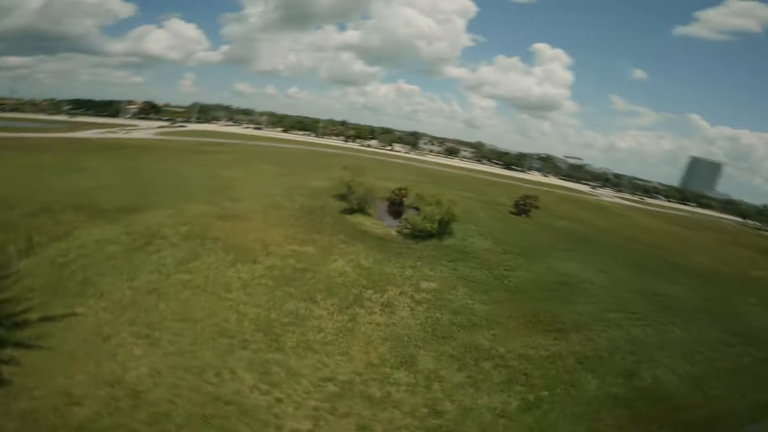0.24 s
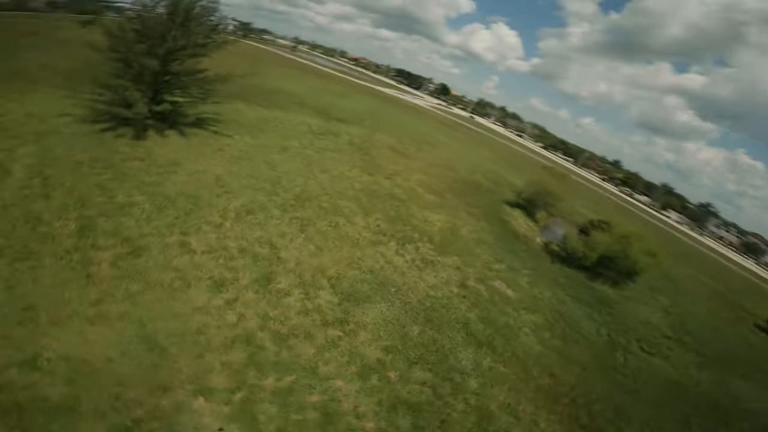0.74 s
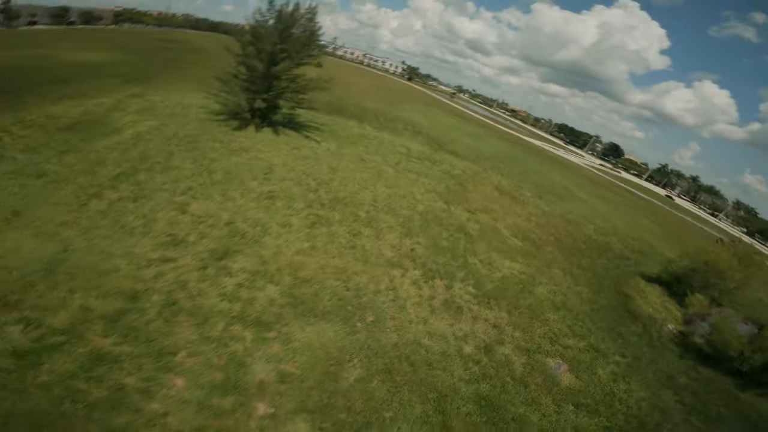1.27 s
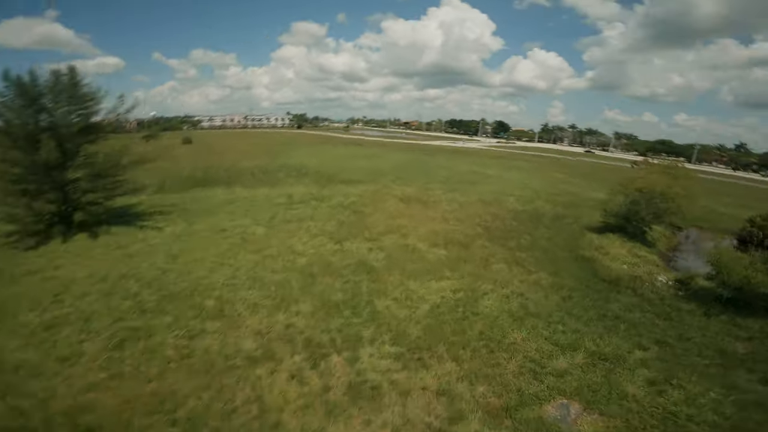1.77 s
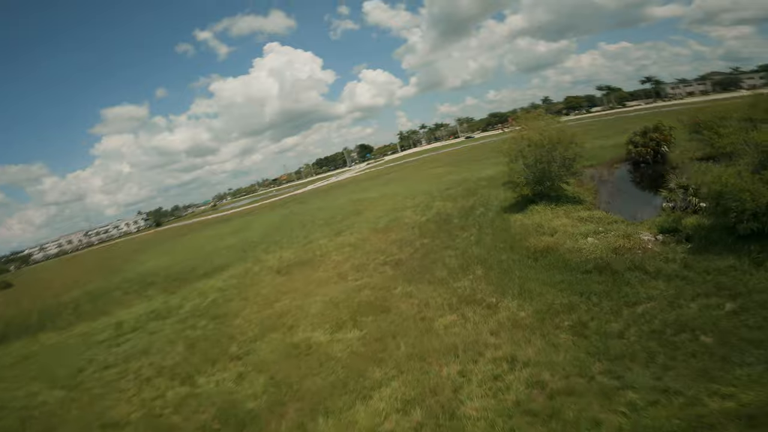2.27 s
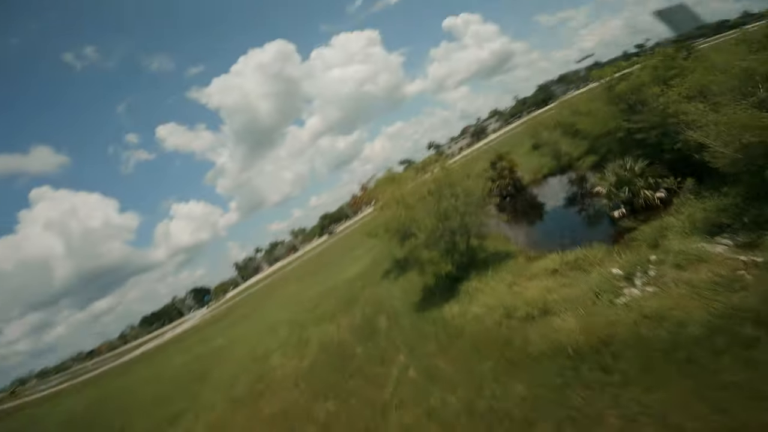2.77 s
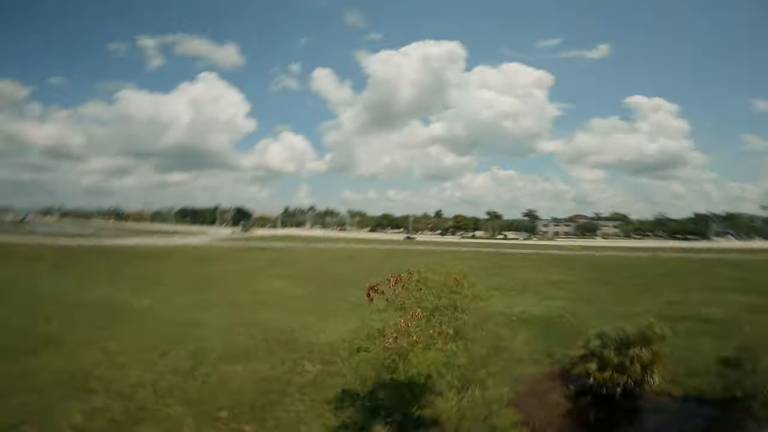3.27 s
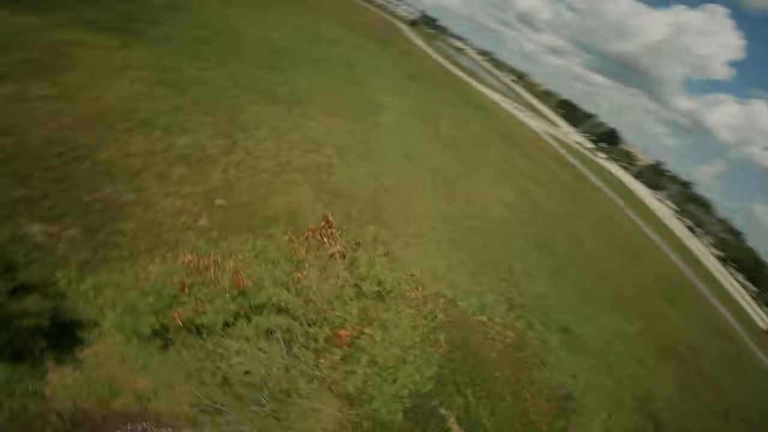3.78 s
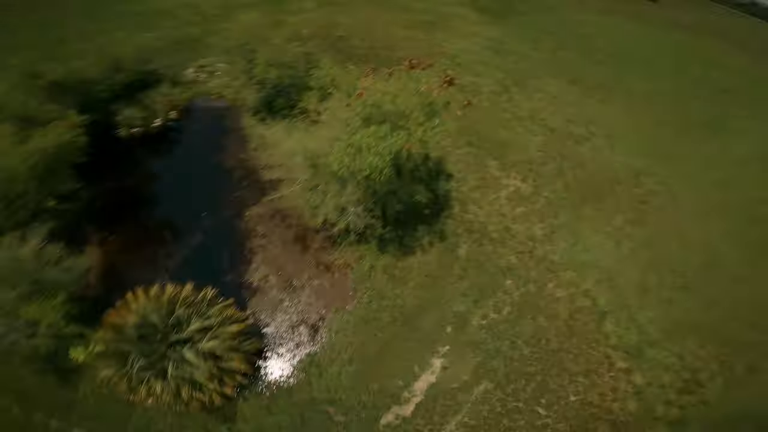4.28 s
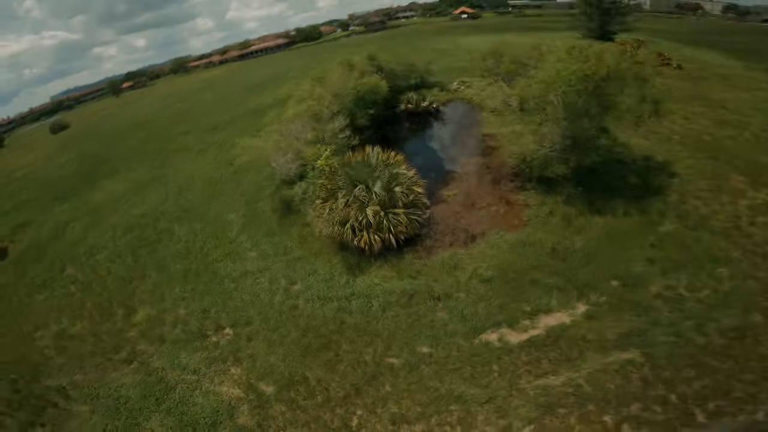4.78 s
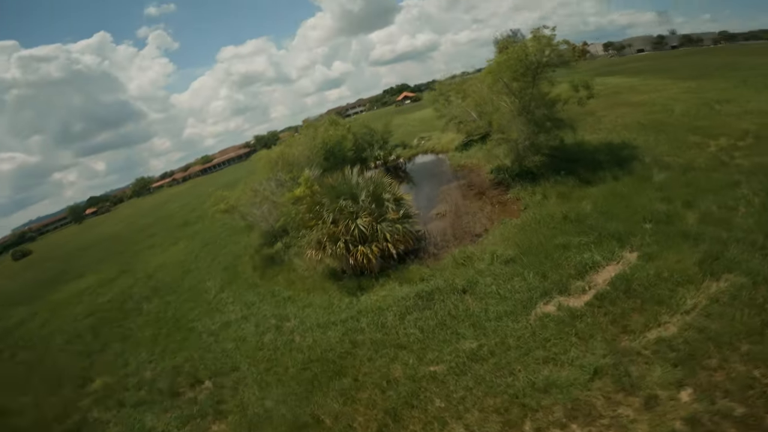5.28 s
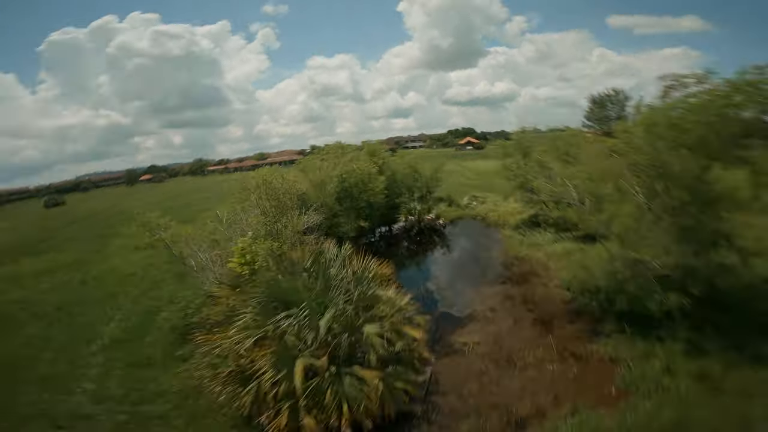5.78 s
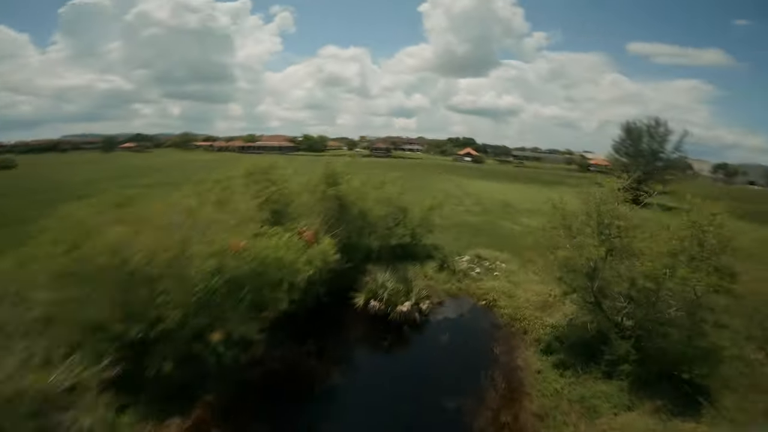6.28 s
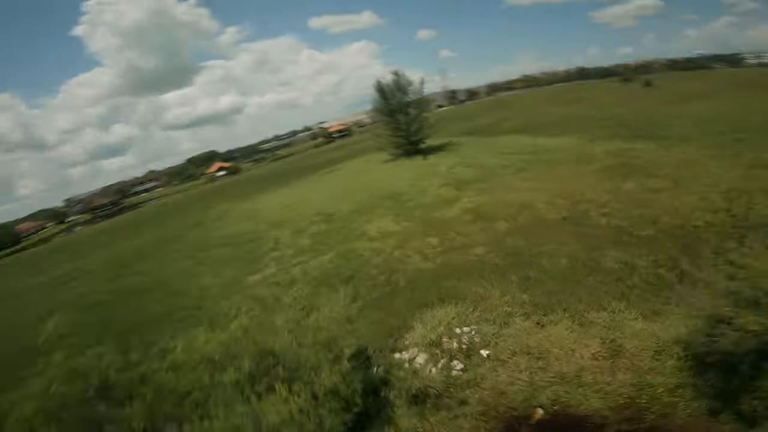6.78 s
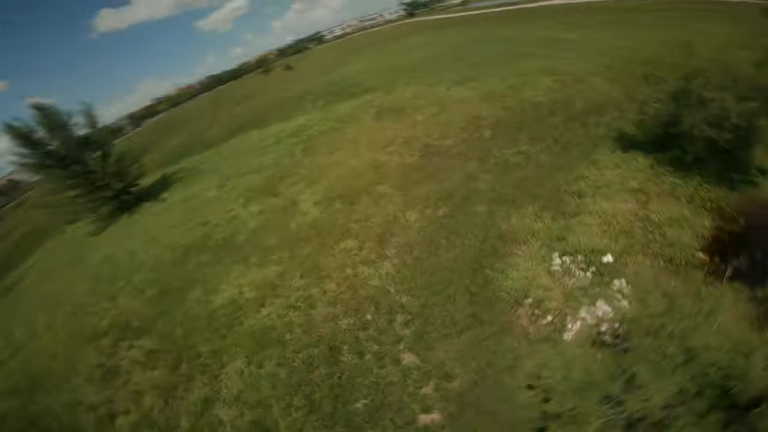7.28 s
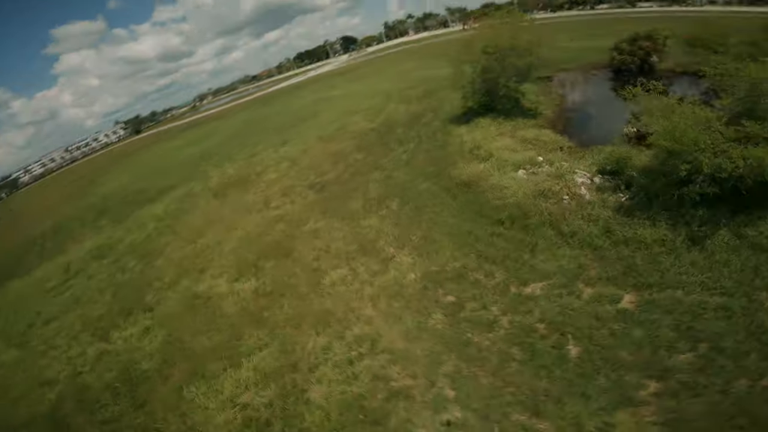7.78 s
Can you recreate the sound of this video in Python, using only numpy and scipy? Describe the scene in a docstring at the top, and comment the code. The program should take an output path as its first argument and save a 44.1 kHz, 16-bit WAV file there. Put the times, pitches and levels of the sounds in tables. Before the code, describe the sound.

Onboard quadcopter motors hum and beat, swelling to strained whines, sinking to a low flutter mid-flight, then surging again amid rumbling airflow.

```python
"""Four rotors of a small quadcopter sing over an open field, heard by a microphone on its own frame.
Each is a harmonic series on its blade rate; they beat as the controller parts their speeds.
Buffeting and a deeper rumble are flickering bands of noise, and a faint noise band whistles at the port.
The blade tips hiss: noise that swells with each sweep. A limiter and the port shape the mix."""
import sys
import numpy as np
from scipy import signal
from scipy.fft import rfft, irfft, next_fast_len
from scipy.io import wavfile
from scipy.ndimage import uniform_filter1d, minimum_filter1d

SR = 44100
rng = np.random.default_rng(int(sys.argv[2]) if len(sys.argv) > 2 else 0)


def int16_out(signal):
    """Quantize to a 16-bit WAV file."""
    q = np.round(np.clip(np.atleast_2d(signal).T, -1, 1) * 32767)
    wavfile.write(sys.argv[1], SR, q.astype(np.int16))


N = 354387

# Source levels are set ahead of the limiter and the port; spectra give shape only.
# throttle, as the blade rate asked of the nearest rotor: [t/s, f/Hz]
THROTTLE_CURVE = [(0, 198.7), (.1, 197.9), (.23, 179.6), (.5, 228), (.6, 280.9), (.7, 328.8), (.82, 410.9),
                  (.91, 428.7), (1.1, 315.5), (1.3, 288.5), (1.9, 254), (2.45, 256.7), (2.72, 285.4),
                  (2.92, 460.4), (3.08, 481.6), (3.25, 312), (3.4, 153.8), (3.55, 70.36), (3.72, 98),
                  (3.78, 69.9), (3.86, 100), (4.0, 64.16), (4.25, 62.58), (4.55, 94.86), (4.66, 177.2),
                  (4.77, 205.6), (4.88, 403.4), (5.03, 275.7), (5.09, 363.6), (5.3, 444), (5.41, 496),
                  (5.56, 319.5), (5.9, 292.7), (6.24, 353.8), (6.4, 307.7), (6.8, 226.2), (7.2, 176.3),
                  (7.4, 167.3), (7.52, 189.8), (7.75, 279.7), (7.92, 368), (8.04, 386.7)]
# voice of the nearest rotor; the last two are offsets to the overtone rules:
# [t/s, fundamental level/dB, second harmonic offset/dB, higher overtone offset/dB]
NEAR_VOICE = [(0, -15.5, 3, -2), (.3, -8.5, 2.5, -4), (.65, -14, 1.5, -1.5), (.9, -14, 7, -3),
              (1.1, -19, 2, -4), (1.3, -8, -0.5, 2), (1.7, -9, 0.5, -0.5), (2.3, -6.5, -2.5, -3),
              (2.55, -13, -11, -6), (2.8, -12.5, 3, -4), (2.95, -17, 10.5, -1.5), (3.08, -17, 13.5, 0.5),
              (3.16, -17, 6.5, -2), (3.3, -11.5, 2, -6), (3.48, -24, -7, -11), (3.8, -17, -10, -14),
              (4.1, -14.5, -10, -6), (4.5, -18.5, -5, 1), (4.6, -17, -4, -5), (4.7, -14.5, -6, -11),
              (4.9, -15.5, -8, -22), (5.02, -21, -1.5, -7), (5.1, -13, 0.5, -7), (5.3, -13, 7, 5),
              (5.4, -9.5, 13, 0), (5.55, -12, 1.5, 1.5), (6.2, -7.5, 4, 1.5), (6.5, -16, -0.5, -1.5),
              (7.15, -9, -2, 0.5), (7.4, -15.5, -1, 2.5), (7.55, -19, -9, -16), (7.75, -6.5, 2.5, -5.5),
              (8.04, -17, -7, -5.5)]
# rotor that steering makes lead the nearest: [t/s, lead f/Hz, fundamental level/dB, overtone offset/dB]
LEADING_ROTOR = [(0, 26.3, -14, -24), (.3, 30.6, -18, -18), (.5, 126, -27, -7), (.68, 147, -36.5, -7),
                 (.8, 108, -13.5, -1), (.92, 88, -25.5, -1), (1.1, 33, -14, -2.5), (1.25, 19.8, -39, -3.5),
                 (2.3, 8.3, -10.5, -14), (2.4, 31.4, -13.5, 1), (2.63, 64, -12.5, 1.5),
                 (2.8, 52.4, -18.5, -4), (2.92, 78.5, -31, 4), (3.1, 96, -27, 7), (3.3, 42, -28, -3),
                 (3.55, 71, -27, -26), (4.45, 69.3, -19, -11), (4.75, 92, -20.5, -23),
                 (4.95, 52, -50, -1.5), (5.4, 55, -20.5, -6), (5.6, 37.4, -16.5, -1), (6.2, 21, -19.5, -12),
                 (6.5, 31.2, -15.5, 2), (7.0, 19.4, -17.5, -6.5), (7.3, 58.5, -11, -4),
                 (7.78, 40, -21.5, -5.5), (7.9, 114, -15, 5), (8.04, 8.2, -16.5, -5)]
# rotor that mostly trails, negative lag when ahead: [t/s, lag f/Hz, fundamental level/dB]
TRAILING_ROTOR = [(0, 29, -7.5), (.42, 49.5, -16), (.5, -80.5, -24), (.54, -65.5, -16), (.63, -20.5, -13),
                  (.71, -30, -16), (.78, 18, -31), (.95, 30, -16.5), (1.1, 36, -17), (1.28, 63.5, -18),
                  (1.35, 40, -46), (2.0, 18, -13.5), (2.7, 25, -17.5), (3.1, 19.5, -30.5), (6.2, 40, -39.5),
                  (6.32, 70, -19), (6.45, 36.5, -19.5), (7.25, 11, -30.5), (7.38, 20, -8),
                  (7.5, -43.5, -14), (7.7, 78.5, -25), (7.9, 79, -22)]
# airstream buffeting, and tip hiss before its make-up gain: [t/s, buffeting level/dB, hiss level/dB]
AIR_LEVELS = [(0, -20.5, -42), (.3, -24, -41.5), (.68, -12, -35), (.78, -17.5, -29.5), (1.3, -19, -34.5),
              (1.7, -19.5, -39.5), (2.25, -24, -41), (2.8, -16.5, -39.5), (3.07, -13, -37.5),
              (3.17, -14.5, -39.5), (3.9, -11.5, -43), (4.45, -18, -48.5), (4.79, -17, -38.5),
              (4.85, -12.5, -27.5), (5, -14.5, -34.5), (5.2, -17.5, -31), (5.55, -23.5, -36),
              (6.2, -20, -32.5), (6.45, -21.5, -39), (6.75, -14, -40), (7.1, -30, -45), (7.35, -30.5, -44),
              (7.5, -13.5, -39.5), (7.92, -12, -30), (8.04, -21.5, -45)]
# spectrum of the buffeting: [f/Hz, level per Hz/dB]
BUFFET_SPECTRUM = [(50, -15.5), (90, -2), (150, -1.5), (300, -4), (600, -13.5), (1200, -23), (2500, -46.5)]
# loudness of the deepest buffeting: [t/s, level/dB]
RUMBLE_LEVELS = [(0.0, -32), (0.92, -17), (2.06, -26.5), (4.19, -19), (4.52, -17.5), (4.97, -11.5),
                 (5.77, -26.5), (6.91, -23), (7.18, -39), (7.54, -16.5), (7.9, -27), (8.04, -32)]
# spectrum of the deepest buffeting: [f/Hz, level per Hz/dB]
RUMBLE_SPECTRUM = [(18, -5.5), (35, -3.5), (60, 1.5), (90, -1.5), (140, -11)]
# spectrum of the tip hiss before its moving tilt: [f/Hz, level per Hz/dB]
HISS_SPECTRUM = [(400, 1.5), (1000, 5), (2000, 7.5), (3500, 5.5), (7000, -0.5), (15000, -11)]
# response of the microphone behind its port: [f/Hz, level/dB]
PORT_RESPONSE = [(3500, -4), (4700, -1), (5400, -3.5), (6500, -11), (7400, -10.5), (8300, -18),
                 (9600, -16.5), (10600, -19.5), (12000, -32.5), (14000, -25), (15500, -54)]

REFERENCE_HZ = 300   # blade rate at which the overtone rules are stated
SPEED_SMOOTHING_S = 0.046   # the motors round off every change
# overtones made by chopping the wash: level at the reference rate, rise with speed, ties to the air levels
WASH_DB, WASH_DB_PER_OCTAVE, WASH_FOLLOWS_HISS, WASH_FOLLOWS_BUFFET = -25, 6.5, 0.11, 0.53
RASP_DB_PER_OCTAVE = 6   # fall of the rasp along the series
# second harmonic at the reference rate, weaker at speed, and the most its rule allows
SECOND_DB, SECOND_DB_PER_OCTAVE, SECOND_MOST_DB = -25.5, -12, -17.5
THIRD_DB, SIXTH_DB = -4, 4   # the third harmonic sinks below the series, the sixth stands out
IDLE_HZ, IDLE_DB_PER_OCTAVE = 140, 16   # unloaded blades lose their overtones below this rate
# rough air shakes the rotor speeds; the waver shrinks below the reference rate
WAVER_HZ, WAVER_FOLLOWS_BUFFET = 3.2, .7
STEADIER_DB_PER_OCTAVE = 9   # above the reference rate the rotors outrun the gusts
SCATTER_RAD, GUST_DB = .11, 1.4   # overtone scatter in average air, before scaling by harmonic number
# the fourth rotor wanders about the speed of the nearest, with a weaker tone and overtones
TWIN_APART_HZ, TWIN_DB, TWIN_OVERTONES_DB = 10, -10, -2.5
WHISTLE_HZ, WHISTLE_WIDTH_HZ, WHISTLE_DB = 4770, 280, -55   # air singing across the port
CUTOFF_HZ = 15600


def from_db(db):
    """Turn decibels into gain."""
    return 10 ** (np.asarray(db) / 20)


def rms_one(x):
    """Scale to rms 1."""
    return x / np.sqrt(np.mean(x ** 2) + 1e-20)


def in_time(rows):
    """Draw each column of a table as an envelope, one value a sample."""
    s, *columns = np.transpose(rows)
    return [np.interp(np.arange(N) / SR, s, c) for c in columns]


def drift(rate):
    """Slow random movement of spread 1: coarse noise through two one-pole low-passes at rate Hz."""
    step = 40   # samples between noise values
    pole = np.exp(-2 * np.pi * step * rate / SR)
    noise = rng.standard_normal(N // step + 2002)
    slow = signal.lfilter([1], [1, -2 * pole, pole * pole], noise)[2000:]   # drop the filter's start-up
    return np.interp(np.arange(N) / step, np.arange(len(slow)), rms_one(slow))


def rotor(hz, tone_db, second_db, wash_db, rasp_db, rough, flutter_db=3.0, count=12):
    """Blade-rate tone and overtones in unsteady inflow; returns the sound and the blade angle."""
    waver_hz = WAVER_HZ * np.minimum(hz / REFERENCE_HZ, 1) * rough * drift(19.43)
    angle = 2 * np.pi * (np.cumsum(hz + waver_hz) / SR + rng.random())
    flutter = flutter_db * np.sqrt(rough) * drift(24)
    out = from_db(tone_db + flutter) * np.sin(angle)
    octaves_below_idle = np.minimum(np.log2(np.maximum(hz, 1) / IDLE_HZ), 0)
    idle = from_db(IDLE_DB_PER_OCTAVE * octaves_below_idle)
    for k in range(2, count + 1):
        if k == 2:
            level_db = second_db
        else:
            # chopping the wash makes these, until the rasp of loaded tips takes over
            chopped_db = wash_db - 14 * np.log2(k * hz / 1000)
            tip_db = rasp_db - RASP_DB_PER_OCTAVE * np.log2(k / 4)
            level_db = np.maximum(chopped_db, tip_db) + THIRD_DB * (k == 3) + SIXTH_DB * (k == 6)
        # gusts scatter each overtone in phase and level, the high ones most
        scatter = SCATTER_RAD * k * np.sqrt(rough) * drift(45)
        gust = from_db(GUST_DB * np.sqrt(k) * drift(30))
        overtone = np.sin(k * angle + 2 * np.pi * rng.random() + scatter)
        out += from_db(level_db) * idle * gust * overtone
    return np.sqrt(2) * out, angle   # sine levels become rms


def banded_noise(spectrum, shared_db, own_db, rate, tilt_db=0):
    """Half-octave noise bands flickering partly together, partly alone; tilt in dB/octave about 4 kHz."""
    hz, level_db = np.transpose(spectrum)
    edges = hz[0] * 2 ** np.arange(0, np.log2(hz[-1] / hz[0]) + .3, .5)
    white = rng.standard_normal((2, N))   # neighbouring bands use different noise
    together = shared_db * drift(rate)
    out = 0
    for k, (low, high) in enumerate(zip(edges, edges[1:])):
        band_pass = signal.butter(2, [low, high], "band", fs=SR, output="sos")
        band = signal.sosfilt(band_pass, white[k % 2])
        shape_db = np.interp(np.log(low * high) / 2, np.log(hz), level_db)
        gain_db = shape_db + tilt_db * np.log2(high / 4000)
        out = out + from_db(gain_db + together + own_db * drift(rate)) * band
    return rms_one(out)


def buffeting(buffet_db):
    """Airstream turbulence striking the microphone port, as low noise in flickering bands."""
    return from_db(buffet_db) * banded_noise(BUFFET_SPECTRUM, shared_db=0.5, own_db=0.65, rate=8.4)


def deep_rumble():
    """The deepest buffeting, as slower and more independent swells of very low noise."""
    level_db, = in_time(RUMBLE_LEVELS)
    return from_db(level_db) * banded_noise(RUMBLE_SPECTRUM, shared_db=.3, own_db=2.5, rate=4)


def port_whistle():
    """Air singing across the port: a faint, gently wavering noise band at its resonance."""
    edges = [WHISTLE_HZ - WHISTLE_WIDTH_HZ / 2, WHISTLE_HZ + WHISTLE_WIDTH_HZ / 2]
    band_pass = signal.butter(2, edges, "band", fs=SR, output="sos")
    band = signal.sosfilt(band_pass, rng.standard_normal(N))
    return from_db(WHISTLE_DB + 2.0 * drift(3.6)) * rms_one(band)


def tip_hiss(hiss_db, wash_db, angles, depth=0.15, brighten=0.32):
    """Turbulence off the blades, louder at each sweep; bright when the tips outdo the wash."""
    sweep = np.exp(depth * sum(np.cos(a) for a in angles))
    excess_db = hiss_db - wash_db
    tilt_db = brighten * (excess_db - np.mean(excess_db))
    noise = banded_noise(HISS_SPECTRUM, shared_db=1.4, own_db=0.4, rate=70, tilt_db=tilt_db)
    return from_db(hiss_db + 7.0) * rms_one(sweep * noise)   # 7 dB of make-up gain


def scene():
    """Rotors, blade turbulence and buffeting at one microphone."""
    asked_hz, = in_time(THROTTLE_CURVE)
    near_hz = uniform_filter1d(asked_hz, round(SPEED_SMOOTHING_S * SR), mode="nearest")
    octaves = np.log2(near_hz / REFERENCE_HZ)
    buffet_db, hiss_db = in_time(AIR_LEVELS)
    buffet_swing_db = buffet_db - buffet_db.mean()
    hiss_swing_db = hiss_db - hiss_db.mean()

    wash_db = WASH_DB + WASH_DB_PER_OCTAVE * octaves
    wash_db = wash_db + WASH_FOLLOWS_HISS * hiss_swing_db + WASH_FOLLOWS_BUFFET * buffet_swing_db
    # the rasp of the tips grows with load and with rotor speed
    rasp_db = hiss_db - 12 + 11.0 * octaves
    second_db = np.minimum(SECOND_DB + SECOND_DB_PER_OCTAVE * octaves, SECOND_MOST_DB)
    steadier_db = STEADIER_DB_PER_OCTAVE * np.maximum(octaves, 0)
    rough = from_db(WAVER_FOLLOWS_BUFFET * buffet_swing_db - steadier_db)

    near_db, near_second, near_over = in_time(NEAR_VOICE)
    lead_hz, fast_db, fast_over = in_time(LEADING_ROTOR)
    lag_hz, slow_db = in_time(TRAILING_ROTOR)
    near, near_angle = rotor(near_hz, near_db, second_db + near_second,
                             wash_db - 5.0 + near_over, rasp_db + near_over, rough, count=21)
    twin_hz = near_hz + TWIN_APART_HZ * drift(2.5)
    twin_second = near_second + TWIN_OVERTONES_DB
    twin_over = near_over + TWIN_OVERTONES_DB
    twin, _ = rotor(twin_hz, near_db + TWIN_DB, second_db + twin_second,
                    wash_db - 3.5 + twin_over, rasp_db + twin_over, rough, count=10)
    fast, fast_angle = rotor(near_hz + lead_hz, fast_db, second_db + fast_over,
                             wash_db - 8.5 + fast_over, rasp_db - 16 + fast_over, rough, count=7)
    slow, _ = rotor(near_hz - lag_hz, slow_db, slow_db - 15.0,
                    wash_db - 14.0, rasp_db - 19, 2 * rough, count=4)

    rotors = near + twin + fast + slow
    air = buffeting(buffet_db) + deep_rumble() + port_whistle()
    hiss = tip_hiss(hiss_db, wash_db, [near_angle, fast_angle])
    return (rotors + air + hiss)[None]


def record(dry):
    """A quick limiter holds the peaks down, the port colours the treble, the top is cut."""
    ceiling, span = 1.0, round(.015 * SR)   # full scale; 15 ms in samples
    gain = minimum_filter1d(np.minimum(1, ceiling / (np.abs(dry) + 1e-9)), span)
    held = dry * uniform_filter1d(gain, span)
    size = next_fast_len(N + SR // 10)
    hz, level_db = np.transpose(PORT_RESPONSE)
    bin_hz = np.arange(size // 2 + 1) * SR / size
    colour = from_db(np.interp(np.log(bin_hz + 1), np.log(hz), level_db))   # + 1 avoids log of zero
    heard = irfft(rfft(held, size) * colour, size)[:, :N]
    top_cut = signal.cheby2(12, 70, CUTOFF_HZ, fs=SR, output="sos")
    return signal.sosfilt(top_cut, heard)


dry = scene()
out = record(dry)
int16_out(out)
```